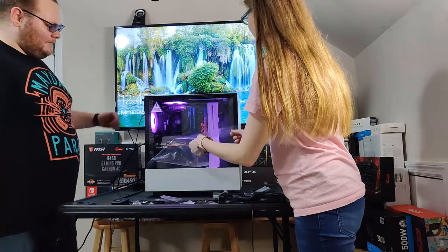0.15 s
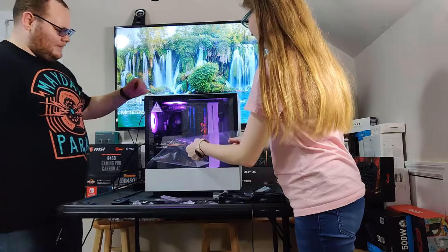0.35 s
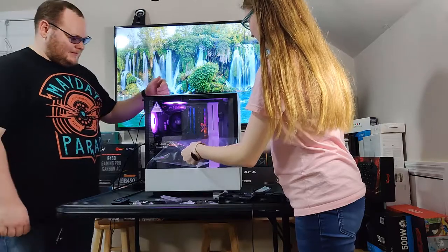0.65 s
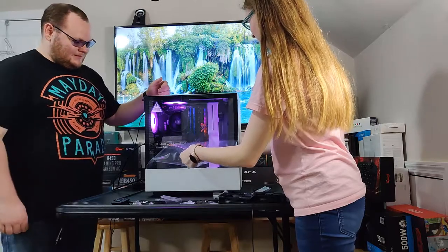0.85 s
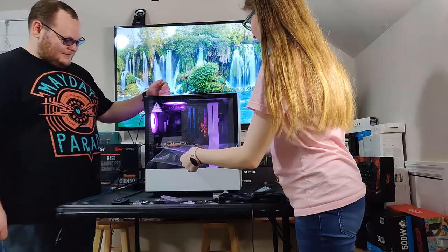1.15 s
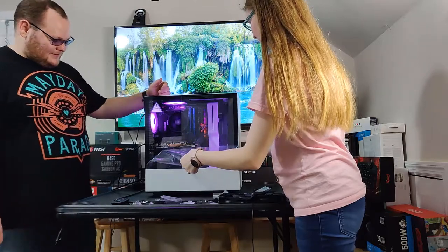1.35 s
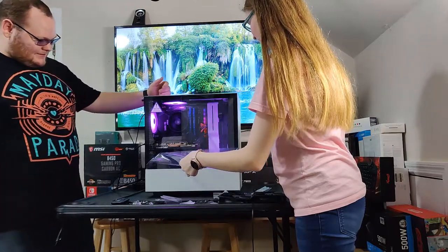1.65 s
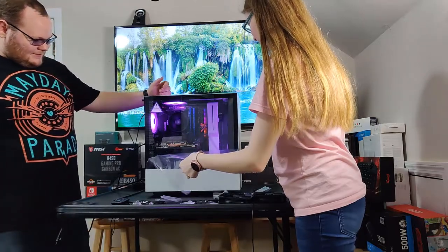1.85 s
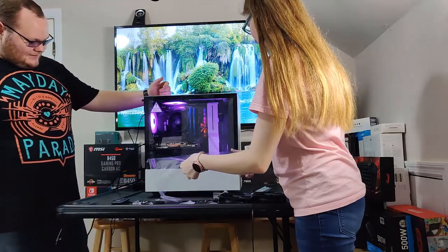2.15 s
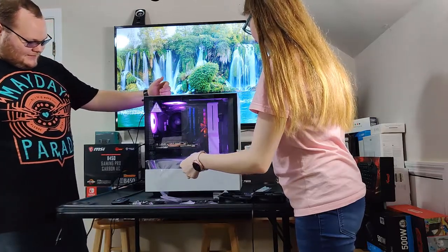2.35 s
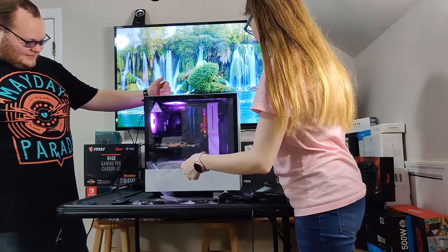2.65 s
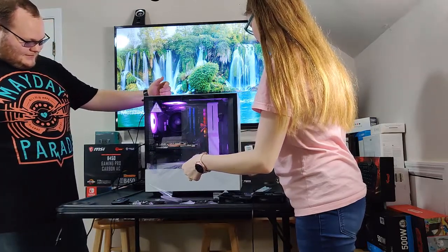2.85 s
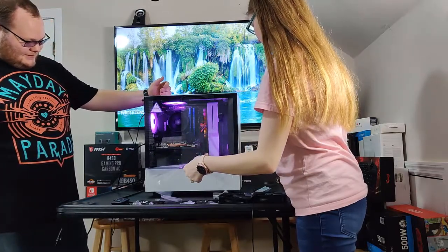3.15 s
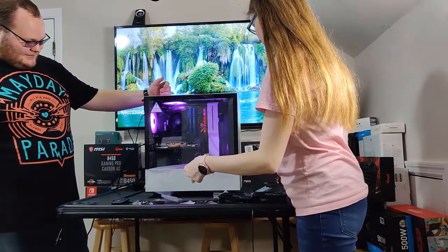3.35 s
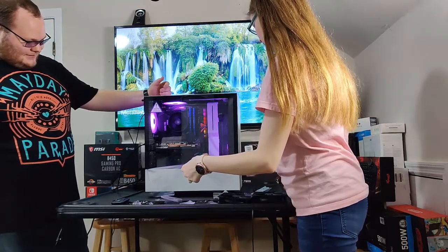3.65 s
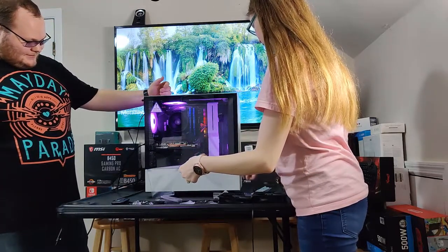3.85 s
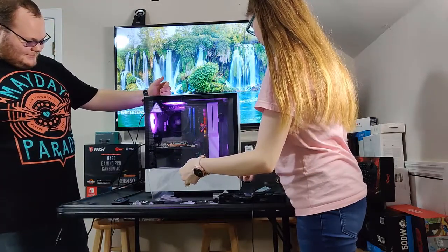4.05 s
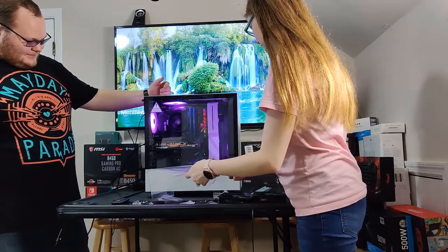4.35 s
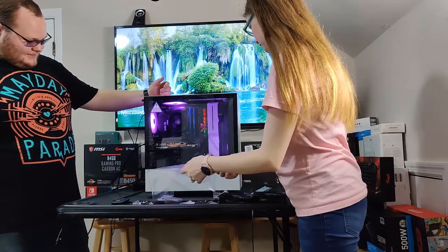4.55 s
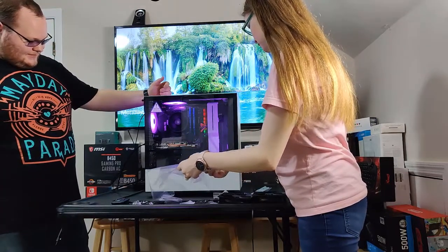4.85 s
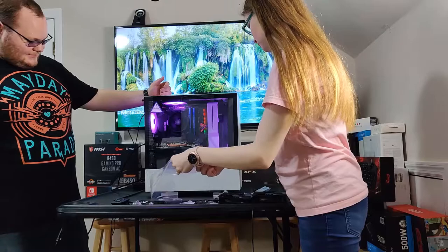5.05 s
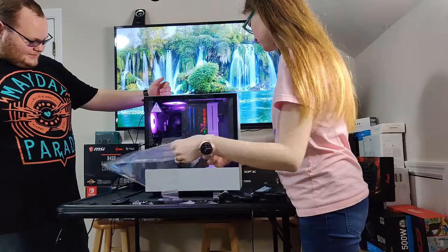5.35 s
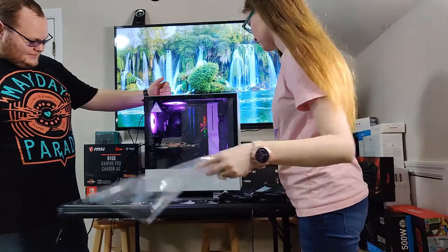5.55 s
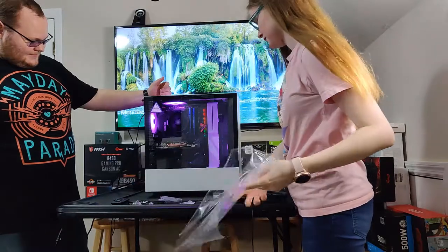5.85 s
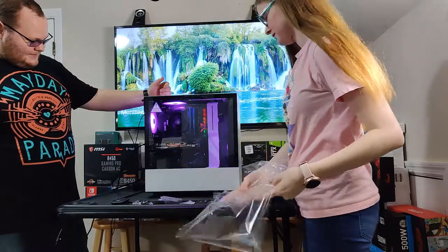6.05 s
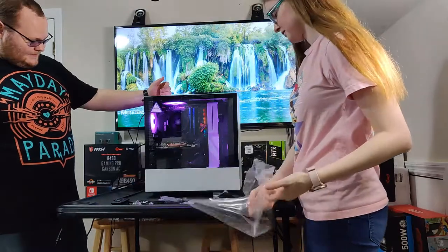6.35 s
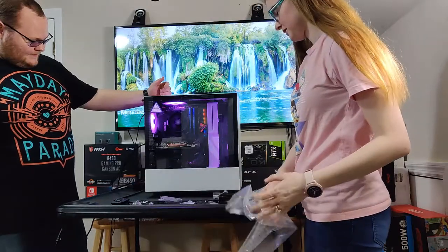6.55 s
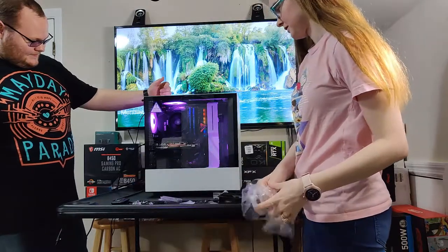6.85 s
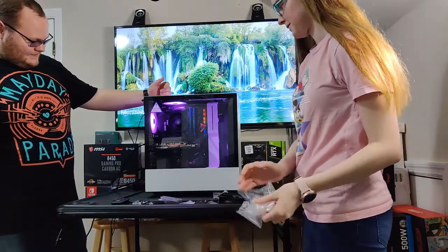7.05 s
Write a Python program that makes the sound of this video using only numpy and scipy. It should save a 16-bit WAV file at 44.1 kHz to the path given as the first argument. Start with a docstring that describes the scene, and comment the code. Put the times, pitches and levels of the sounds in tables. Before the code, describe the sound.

Thin plastic film is slowly peeled from the glass side of a computer case. The glue lets go in small, irregular snaps and creaks, with one brief high squeak. A short rip follows, then two sharp cracks, the loudest sounds. The loose sheet crinkles and pops softly as it is crumpled by hand. It is heard from nearby in a small, quiet room, with barely any fan noise.

```python
"""Plastic film is peeled off the glass side of a computer case and crumpled by hand in a small room.
The glue lets go in single snaps, creaky runs, one long rip and one stick-slip squeal.
The loose sheet crinkles as creases flip and pops as bulges turn over.
Snaps and crinkle carry two narrow rings: the pane near 806 Hz, and a faint thin tone near 2350 Hz.
A noise suppressor holds the computer's fans down and eats whatever is fainter than they are."""
import sys
import numpy as np
from scipy import signal
from scipy.fft import rfft, irfft, next_fast_len
from scipy.io import wavfile
from scipy.ndimage import uniform_filter1d, minimum_filter1d

SR = 44100
rng = np.random.default_rng(int(sys.argv[2]) if len(sys.argv) > 2 else 0)


def write(x):
    x = np.atleast_2d(x).T
    wavfile.write(sys.argv[1], SR, np.round(np.clip(x, -1, 1) * 32767).astype(np.int16))


N = 317520

# fan noise spectrum: f/Hz, relative density/dB
FAN_SPECTRUM = [(25, -12), (180, -7), (480, -9.5), (900, -13), (1500, -20), (3000, -31), (8000, -42),
                (16000, -31)]
FAN_RMS_DB = -59.5


def amp(db):
    """dB to gain."""
    return 10 ** (np.asarray(db) / 20)


def unit_rms(x):
    """x at rms 1."""
    return x / np.sqrt(np.mean(x ** 2) + 1e-20)


def log_interp(points, hz):
    """(f/Hz, value) points read on a log frequency axis."""
    f, values = np.transpose(points)
    return np.interp(np.log(hz + 1), np.log(f + 1), values)


def filtered(x, response):
    """x through a complex frequency response."""
    size = next_fast_len(x.shape[-1] + 8192)
    f = np.fft.rfftfreq(size, 1 / SR)
    return irfft(rfft(x, size) * response(f), size)[..., :x.shape[-1]]


def resonance(f, hz, width_hz):
    """Causal resonance, peak gain 1."""
    return 1j * f * width_hz / (hz * hz - f * f + 1j * f * width_hz)


def tilted(x, db_per_oct):
    """Time-varying tilt over three bands about two octaves apart."""
    low = lambda f, edge_hz: 1 / (1 + 1j * f / edge_hz) ** 2
    high = lambda f, edge_hz: (1j * f / edge_hz / (1 + 1j * f / edge_hz)) ** 3
    bands = lambda f: np.array([low(f, 1623), high(f, 676) * low(f, 9250), high(f, 2773)])
    octaves = np.array([[-2], [0], [2]])
    return filtered(x * amp(db_per_oct * octaves), bands).sum(0)


def diffuse(noise):
    """Two independent noises mixed into a diffuse stereo field."""
    # diffuse field: f/Hz, left-right coherence
    coherence = [(60, 0.58), (3000, 0.24), (7000, 0.11), (15000, .05)]
    angle = lambda f: np.arccos(np.clip(log_interp(coherence, f), -1, 1)) / 2
    mid, side = filtered(noise, lambda f: np.array([np.cos(angle(f)), np.sin(angle(f))]))
    return np.array([mid + side, mid - side])


def fans():
    """Steady air noise from the computer."""
    air = diffuse(rng.standard_normal((2, N)))
    return amp(FAN_RMS_DB) * unit_rms(filtered(air, lambda f: amp(log_interp(FAN_SPECTRUM, f))))


def room(x, tail_db=-6, block=8192):
    """Early reflections, then a diffuse tail, redrawn per block for the moving hands."""
    # nearest surfaces: delay/s, level/dB
    reflections = [(.0046, -11.5), (.0078, -16)]
    # room decay: f/Hz, t60/s
    decay = [(300, 0.3), (1500, 0.26), (4000, 0.21), (12000, 0.17)]
    out = np.zeros((2, N + block + SR))
    for delay_s, db in reflections:
        for channel, stretch in zip(out, (1, 1.04)):
            channel[round(delay_s * stretch * SR):][:N] += amp(db) * x
    for start in range(0, N, block):
        f, t, spectra = signal.stft(rng.standard_normal((2, SR // 3)), SR, nperseg=256)
        spectra *= amp(-60 * t / log_interp(decay, f)[:, None])
        tail = diffuse(signal.istft(spectra, SR, nperseg=256)[1])
        tail /= np.linalg.norm(tail[0])
        wet = signal.fftconvolve(x[None, start:start + block], tail, axes=1)
        out[:, start + 200:][:, :wet.shape[1]] += amp(tail_db) * wet
    return out[:, :N]


def film(x, gain_db):
    """An excitation radiates through the sheet and picks up two narrow rings."""
    # sheet radiation: f/Hz, gain/dB
    radiation = [(88, -47.5), (150, -52.5), (244, -13), (941, 2.5), (1190, 2), (2600, 2.5), (5050, -2.5),
                 (11500, -10), (16000, -16.5)]
    # narrow rings, the pane near 806 Hz and a faint thin tone near 2350 Hz: f/Hz, width/Hz, gain/dB
    rings = [(806, 8.2, 7.5), (2354, 29, -11.5)]
    ringing = lambda f: 1 + sum(amp(db) * resonance(f, hz, width_hz) for hz, width_hz, db in rings)
    return amp(gain_db) * filtered(x, lambda f: amp(log_interp(radiation, f)) * ringing(f))


def flexes(t60_s=0.082, attack_s=0.0023):
    """A bulge of the loose sheet pops over with a short, soft note."""
    # bulge pops: t/s, level/dB, f/Hz
    pops = [(.518, -49.5, 418), (1.45, -52, 664), (4.804, -44.5, 384), (6.25, -54, 777), (6.485, -52, 852),
            (6.605, -45, 541), (6.629, -48, 536), (6.815, -44.5, 557), (6.85, -49, 553)]
    out, t = np.zeros(N + SR), np.arange(SR // 8) / SR
    for s, db, hz in pops:
        envelope = amp(db - 60 * t / t60_s) * (1 - np.exp(-t / attack_s))
        out[round(s * SR):][:len(t)] += envelope * np.sin(2 * np.pi * hz * t)
    return out[:N]


def handling(t, swell_db=32, fall_db_per_s=450, held_db_per_oct=1):
    """Crinkle level and tilt: each tug swells, holds and goes slack over the steady tension."""
    # tugs and squeezes that rustle or rip: t at full pull/s, swell/s, hold/s, level/dB, tilt/(dB/oct)
    tugs = [(0.022, 0.089, 0.32, -63.5, -0.5), (0.526, 0.078, 0.025, -59, 1.5),
            (0.944, .2, 0.012, -58, -2.5), (1.977, 0.13, 0.0029, -50, -1), (2.137, 0.41, 0.17, -68, 4),
            (2.498, 0.14, 0.077, -51.5, 6), (2.937, 0.5, 0.011, -60, 0.5), (3.122, 0.18, 0.033, -61.5, 2),
            (3.312, 0.23, 0.012, -57.5, -0.5), (4.002, 0.32, 0.0046, -44, 0.5),
            (4.05, 0.0026, 0.13, -30.5, 1), (4.537, 0.16, 0.013, -58.5, -5.5),
            (4.9, 0.077, 0.023, -41.5, 4), (5.196, .3, 0.042, -50.5, 1), (6.028, 0.29, 0.011, -43, 2),
            (6.191, 0.51, 0.055, -51, 0.5), (6.509, 0.13, 0.028, -45.5, 1.5),
            (6.64, 0.28, 0.24, -46.5, 1.3), (6.982, 0.13, .25, -47.5, 1.5)]
    # faint crinkle of the held film: t/s, level/dB
    tension = [(0, -59), (.45, -76), (.62, -65.5), (.85, -70), (1.1, -65), (1.53, -57.5), (1.8, -74),
               (2.4, -69), (2.65, -86.5), (3.2, -75), (3.45, -94), (3.75, -74.5), (4.35, -79.5), (4.6, -64),
               (5, -71), (5.35, -60), (5.7, -60.5), (6.3, -58.5)]
    full_s, swell_s, hold_s, db, tilt = np.transpose(tugs)[:, :, None]
    drop_db = np.maximum(swell_db * (full_s - t) / swell_s, fall_db_per_s * (t - full_s - hold_s))
    tug_power = amp(db - drop_db.clip(0, 200)) ** 2
    held_power = amp(np.interp(t, *np.transpose(tension))) ** 2
    power = tug_power.sum(0) + held_power
    mean_tilt = ((tug_power * tilt).sum(0) + held_power * held_db_per_oct) / power
    return 10 * np.log10(power), mean_tilt


def crinkle(flips_per_s=400, spread_db=5, cap_db=14, t60_s=0.011):
    """Small creases flip at random, many weak, few strong, on a hiss that thickens with the pull."""
    t = np.arange(N) / SR
    db, tilt = [np.interp(t, t[::32], curve) for curve in handling(t[::32])]
    onsets = rng.random(N) < flips_per_s / SR
    flips = onsets * amp(np.minimum(spread_db * rng.exponential(size=N), cap_db))
    flip_power = signal.fftconvolve(flips ** 2, amp(-60 * t[:300] / t60_s) ** 2)[:N].clip(0)
    hiss = 0.9 * amp(0.17 * (db - db.max()))
    envelope = (unit_rms(np.sqrt(flip_power)) + hiss) / np.sqrt(1 + hiss ** 2)
    grains = envelope * rng.standard_normal(N)
    return film(tilted(grains * amp(db), tilt), gain_db=10)


def squeal(pitch_jitter=0.006, flutter_db=3.5):
    """Film sticks and slips on the glass, locking into high tones of unsteady pitch and level."""
    # stick-slip tones, one list each: t/s, f/Hz, level/dB
    tones = [
        [(2.492, 7200, -28), (2.496, 6800, -15.5), (2.508, 7080, -29.5)],
        [(2.492, 14200, -41), (2.505, 13800, -35)],
        [(2.505, 10200, -37.5), (2.52, 11500, -22.5), (2.534, 10500, -34), (2.543, 10470, -24),
         (2.548, 7650, -19.5), (2.557, 9040, -29.5)],
        [(2.555, 12100, -23.5), (2.563, 13400, -26.5), (2.568, 15500, -40)],
    ]
    out = np.zeros(N)
    for tone in tones:
        s, hz, db = np.transpose(tone)
        span = np.arange(round(s[0] * SR), round(s[-1] * SR))
        waver, flutter = map(unit_rms, uniform_filter1d(rng.standard_normal((2, len(span))), size=40))
        pitch_hz = np.interp(span / SR, s, hz) * (1 + pitch_jitter * waver)
        level = amp(np.interp(span / SR, s, db) + flutter_db * flutter)
        fade = signal.windows.tukey(len(span), 0.15)
        out[span] += level * fade * np.sqrt(2) * np.sin(2 * np.pi * np.cumsum(pitch_hz) / SR)
    return filtered(out, lambda f: 2 * (f / (f + 3000)) ** 4)


def creak_slips(gap_jitter=0.074, scatter_db=2.5, db_per_oct=0.5):
    """Creaks: runs of almost evenly spaced slips along the glue line, as rows for snaps()."""
    # creaks: start/s, length/s, gap/s, level/dB, ring f/Hz
    creaks = [(0.2027, .028, .011, -31, 1040), (0.24, .04, 0.018, -28.5, 1090),
              (0.2933, .034, 0.0092, -29.5, 1060), (3.8907, .028, 0.0058, -31.5, 1880),
              (3.934, .027, .0058, -31, 1850), (4.5144, .035, 0.013, -30.5, 970)]
    rows = []
    for start_s, length_s, gap_s, db, hz in creaks:
        grid_s = np.arange(start_s, start_s + length_s, gap_s)
        lateness, strength = rng.standard_normal((2, 8))[:, :len(grid_s)]
        times_s = grid_s + gap_jitter * gap_s * lateness
        levels_db = db + scatter_db * strength
        rows += [(s, level_db, hz, db_per_oct) for s, level_db in zip(times_s, levels_db)]
    return rows


def snaps(ring_db=6, q=5, rise_s=0.0018, leak_db=-10, mode_ratios=(1, 1.5, 2.1)):
    """Each release is a burst of a few milliseconds that rings the freed patch like a small drum."""
    # glue and crease snaps: t/s, level/dB, lowest patch mode f/Hz, tilt/(dB/oct)
    releases = [(0.036, -31.5, 2160, -0.5), (0.0441, -34.5, 2030, 9), (0.0884, -27, 1430, 2),
                (0.1116, -36.5, 2120, -2), (0.1261, -27, 1570, 3), (0.1292, -34, 1010, -1),
                (0.164, -29.5, 1670, 0.5), (0.1688, -33, 1050, -1.5), (0.354, -31.5, 1640, 7),
                (0.3873, -33, 1170, 0.5), (0.516, -26.5, 1290, 4), (0.5271, -34, 1270, -1),
                (0.5447, -20, 1280, 4.5), (0.6934, -22, 1720, 2), (0.706, -35.5, 1840, 1.5),
                (0.871, -35.5, 2040, 5), (0.9322, -27, 1660, 0), (0.9521, -35, 1680, 3.5),
                (0.9653, -20.5, 1380, 5), (1.074, -24, 1680, 9), (1.0932, -36, 1740, -3.5),
                (1.1217, -23, 1410, 0.5), (1.1851, -30.5, 1740, 6.5), (1.2, -38.5, 1340, -3.5),
                (1.215, -27.5, 1930, 2), (1.2632, -23.5, 1760, 3), (1.3105, -28, 2900, -3.5),
                (1.3225, -32, 1930, 6), (1.346, -34, 2400, -1.5), (1.3673, -27.5, 1490, 3.5),
                (1.448, -32.5, 1810, 2.5), (1.4659, -20, 1680, 2), (1.5113, -20, 1870, 1.5),
                (1.519, -27, 980, 1.5), (1.6584, -35.5, 2000, 3), (1.7213, -33, 2350, 9),
                (1.8803, -43, 1860, 1), (1.954, -27.5, 4630, -0.5), (1.974, -35.5, 1210, 0),
                (2.1137, -30.5, 2740, 8.5), (2.8646, -26.5, 1820, 1), (3.1009, -29.5, 3630, 0),
                (3.23, -36.5, 3200, 1), (3.3398, -8, 960, 4.5), (3.641, -40, 2780, 5),
                (3.687, -43, 2780, 3.5), (3.745, -37, 2800, 4.5), (3.879, -29.5, 1880, 5),
                (3.9987, -16, 815, 3), (4.0523, -10, 806, 5), (4.4385, -38, 1160, -1),
                (4.4946, -28, 1790, -3.5), (4.5873, -31.5, 1290, 1.5), (4.6072, -35.5, 1910, 5),
                (4.7219, -37, 2500, 2.5), (4.742, -42, 2480, -2.5), (4.805, 1.5, 2220, 0.5),
                (4.8688, -2.5, 2540, -1.5), (5.0837, -32, 2040, 3), (5.12, -29.5, 2930, 3),
                (5.1723, -23, 2170, 1.5), (5.1825, -29, 2030, 15), (5.27, -28.5, 1930, 2),
                (5.543, -39, 2070, 0), (5.643, -30.5, 2010, 2.5), (5.6968, -33, 2560, 0),
                (5.8505, -30, 2020, 3.5), (5.9097, -26.5, 1270, 3.5), (6.011, -15.5, 1900, 3.5),
                (6.2733, -35, 1420, -1.5), (6.4527, -24, 2170, 4.5), (7.004, -30.5, 1880, -3)]
    out, t = np.zeros(N + SR), np.arange(2048) / SR
    f = np.fft.rfftfreq(len(t), 1 / SR)
    envelope = (t / rise_s * np.exp(1 - t / rise_s)) ** 2
    lead_samples = 32
    for s, db, hz, tilt in releases + creak_slips():
        drum = 1 + amp(ring_db) * sum(resonance(f, hz * k, hz / q) / k for k in mode_ratios)
        highpass = (1j * f / (0.74 * hz + 1j * f)) ** 3  # a patch radiates little below its lowest mode
        leak = amp(leak_db + 0.57 * db)  # a strong tug shakes the whole sheet
        colour = drum * (leak + highpass) * amp(tilt * np.log2(f / 2500 + 0.22))
        burst = np.roll(rng.standard_normal(len(t)) * envelope, lead_samples)
        snap = irfft(rfft(burst) * colour)
        snap *= np.linalg.norm(envelope) / np.linalg.norm(snap)
        out[round(s * SR) - lead_samples:][:len(t)] += amp(db) * snap
    return film(out[:N], gain_db=-1.5)


def scene(left_lead_s=1.5e-5):
    """The film near the middle, slightly closer to the left, with its room and the fans."""
    # where the film is held: t/s, left over right/dB
    hands = [(0, 0.3), (2.397, -0.5), (4.001, -0.4), (7.2, -1.7)]
    source = snaps() + flexes() + crinkle() + squeal()
    direct = filtered(source, lambda f: np.exp(1j * np.pi * f * np.array([[1], [-1]]) * left_lead_s))
    pan_db = np.interp(np.arange(N) / SR, *np.transpose(hands))
    return amp(np.array([pan_db, -pan_db]) / 2) * (direct + room(source)) + fans()


def record(dry, ceiling=0.8, margin_db=3.75, floor_db=-18, cutoff_hz=16000, frame=1024):
    """Peak limiter, noise suppressor that subtracts the fan spectrum band by band, then low-pass."""
    headroom = minimum_filter1d(ceiling / np.maximum(abs(dry).max(0), ceiling), size=400)
    limited = dry * uniform_filter1d(headroom, size=200)
    framing = dict(fs=SR, nperseg=frame, noverlap=frame * 3 // 4)
    hz, _, spectra = signal.stft(limited, **framing)
    fan_power = amp(log_interp(FAN_SPECTRUM, hz)) ** 2
    fan_power *= amp(FAN_RMS_DB + margin_db) ** 2 / fan_power.sum()
    power = uniform_filter1d(np.mean(abs(spectra) ** 2, 0), size=3, axis=0)  # across bins
    power = uniform_filter1d(power, size=8, axis=1)  # across frames
    gain = np.sqrt(np.clip(1 - fan_power[:, None] / (abs(power) + 1e-20), amp(floor_db) ** 2, 1))
    suppressed = signal.istft(spectra * gain, **framing)[1][:, :N]
    return filtered(suppressed, lambda f: np.clip((cutoff_hz + 150 - f) / 300, 0, 1) ** 2)


dry = scene()
out = record(dry)
write(out)
```